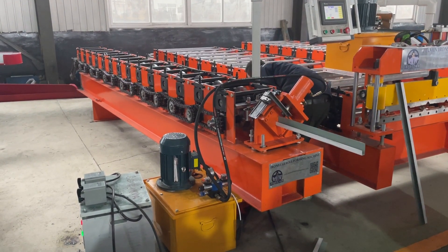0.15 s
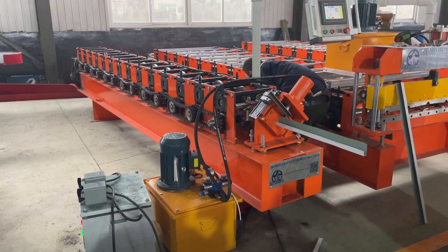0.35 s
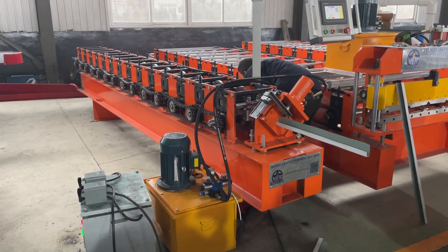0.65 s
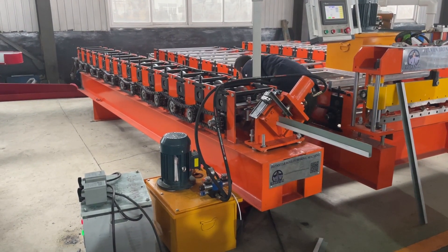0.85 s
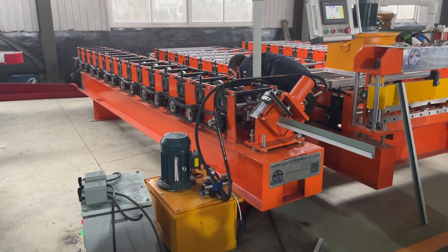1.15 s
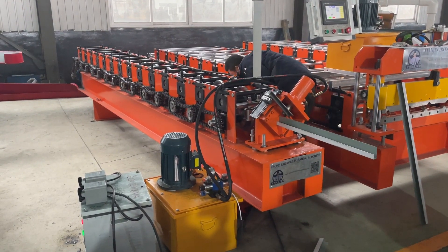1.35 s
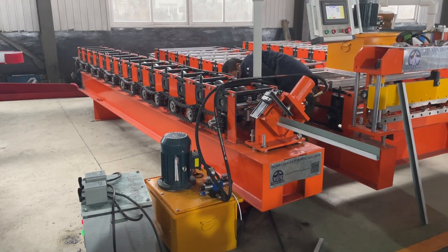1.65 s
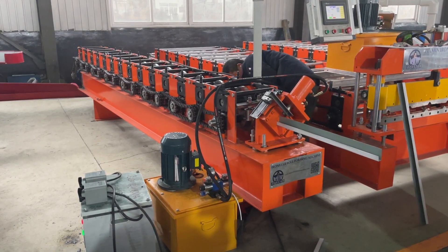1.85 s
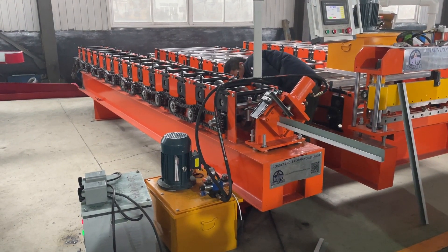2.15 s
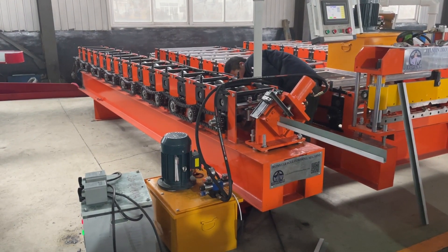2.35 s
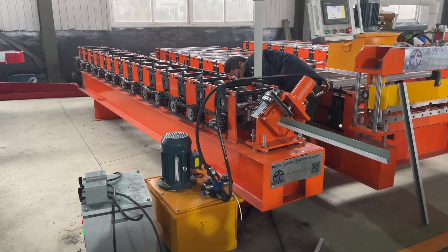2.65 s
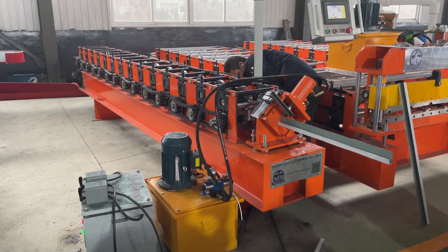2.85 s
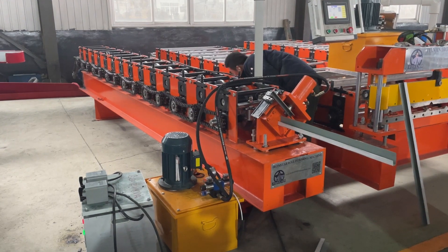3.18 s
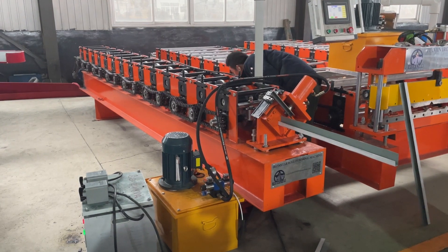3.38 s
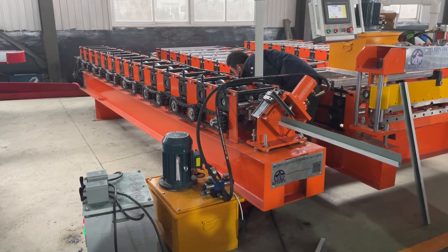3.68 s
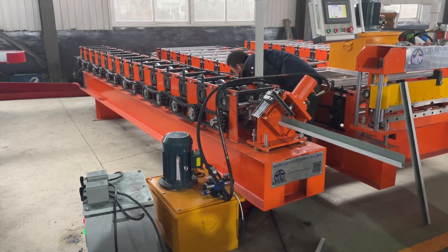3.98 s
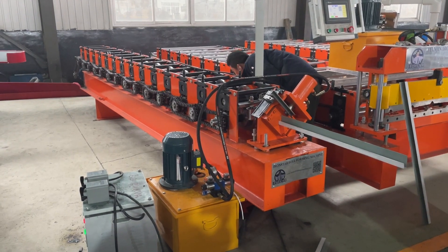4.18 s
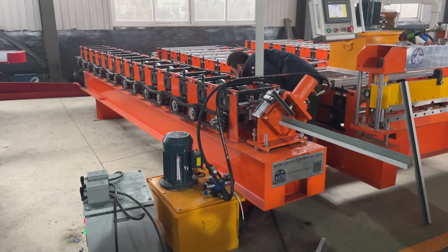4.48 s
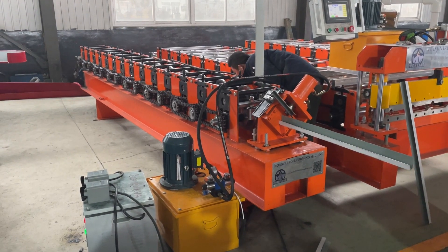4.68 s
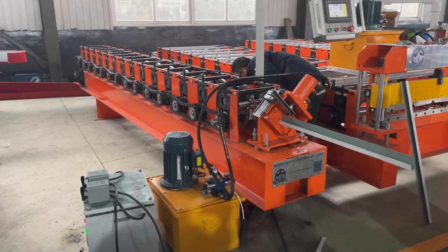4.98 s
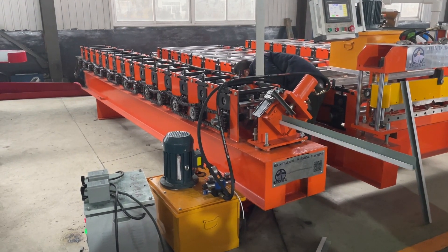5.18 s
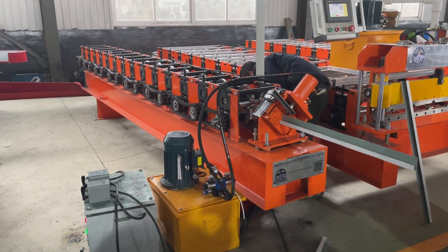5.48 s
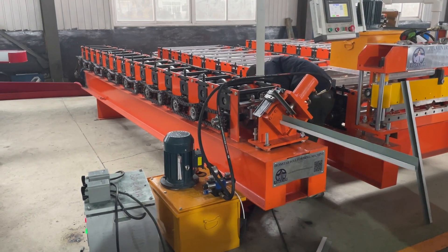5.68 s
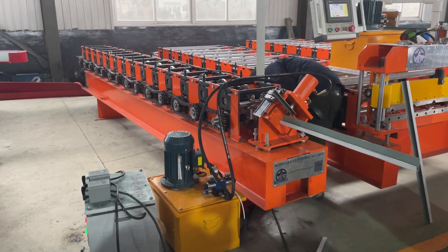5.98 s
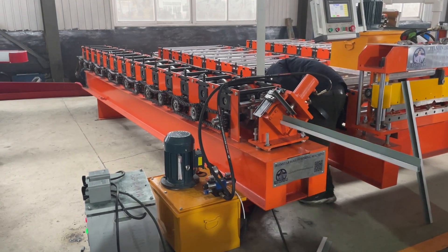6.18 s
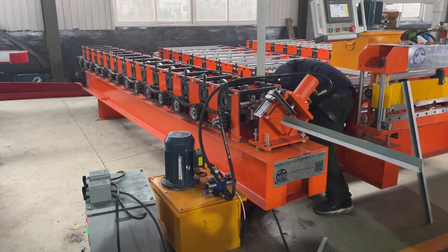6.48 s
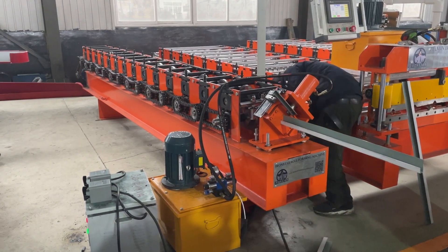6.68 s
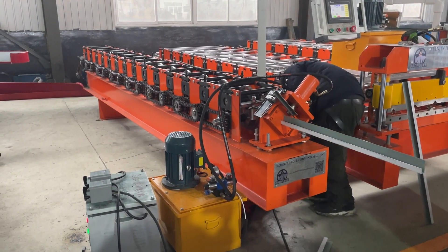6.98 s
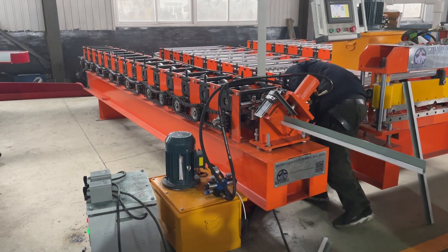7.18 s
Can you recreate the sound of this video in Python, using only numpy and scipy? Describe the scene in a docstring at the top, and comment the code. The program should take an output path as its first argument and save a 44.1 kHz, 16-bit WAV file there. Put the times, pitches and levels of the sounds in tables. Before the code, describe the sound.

A hydraulic pump whines over a rumbling roll forming machine; steel clacks and squealing metal lead to a sharp crack, then a rough grinding hum settles into a drone.

```python
"""A hydraulic pump whines steadily over the rumble of a roll forming machine that feeds out a steel channel.
Steel parts clack and frame modes thud; each blow decays exponentially in the factory hall.
The strip slips and squeals by stick-slip: wavering lines and noise-driven resonances, with scuffs and rasps.
The drive then takes up a heavy load: gear contacts grind as shaped noise, the gear mesh hums in harmonics,
and the sound settles into a drone."""
import sys
import numpy as np
from scipy import signal
from scipy.fft import rfft, irfft, next_fast_len
from scipy.io import wavfile

SR = 44100
rng = np.random.default_rng(int(sys.argv[2]) if len(sys.argv) > 2 else 0)


def bounce(signal):
    """Save signal as a 16-bit WAV file at the path given by the first command-line argument."""
    frames = np.transpose(np.atleast_2d(signal))
    limited = np.clip(frames, -1, 1)
    pcm = np.round(limited * 32767).astype(np.int16)
    wavfile.write(sys.argv[1], SR, pcm)


N = 323694
SIZE = next_fast_len(N + 4096)
TIME = np.arange(N) / SR  # s
FREQ = np.maximum(np.arange(SIZE // 2 + 1) * SR / SIZE, 1)  # Hz

# the drive takes up its load, carries it in full for a while, and the grinding bites at once
LOAD_S, LOAD_HOLD_S, GRIND_ATTACK_S = 3.2, 0.43, 0.032
# dull thuds of the frame, which also shake the roll stands:
# (time [s], level [dB], pitch [Hz], 60 dB decay [s], shake [dB])
THUD_BLOWS = [(.56, -27, 244.7, 0.45, 0.5), (1.512, -29, 290.5, 0.084, -15), (1.658, -38, 233, 0.54, -7.5),
              (3.212, -27, 300, .2, -8), (3.245, -20.5, 272.2, 0.3, -6), (3.335, -21.5, 272, .25, -15),
              (4.285, -27.5, 225, .3, -25), (5.18, -28, 185, .25, -20), (5.213, -19.5, 180, 0.3, -15),
              (5.272, -27, 172, .3, -20)]
# slips of the strip in the rolls; each scuffs, then rasps:
# (time [s], scuff level [dB], scuff rise [s], rasp level [dB])
STRIP_SLIPS = [(.55, 2, 0.037, -9.5), (1.647, 4, 0.042, -15), (1.93, 5.5, 0.012, -9),
               (2.27, 0.5, 0.024, -9), (2.58, 4, .011, -9), (2.91, 2.5, 0.0086, -4), (3.11, 1, 0.027, -15),
               (3.25, 5.5, 0.054, -22), (3.44, -2, 0.017, -11), (3.61, 0, .02, -6)]


def from_db(db):
    """Logarithmic level: decibels to an amplitude gain."""
    return 10 ** (np.asarray(db) / 20)


def rms_one(x):
    """Power normalisation: scale to unit rms."""
    return x / np.sqrt(np.mean(x ** 2) + 1e-20)


def over_hz(points):
    """Spectral interpolation: straight lines on a log-frequency axis."""
    hz, value = np.transpose(points)
    return np.interp(np.log(FREQ), np.log(hz), value)


def filtered(x, response):
    """Linear filtering: multiply the spectrum by a frequency response."""
    return irfft(rfft(x, SIZE) * response, SIZE)[..., :N]


def drift(rate):
    """Low-pass random process: two equal poles at rate [Hz] smooth white noise to unit rms."""
    step = 40  # samples between the slow values
    pole = np.exp(-2 * np.pi * step * rate / SR)
    noise = rng.standard_normal(N // step + 2002)
    slow = signal.lfilter([1], [1, -2 * pole, pole * pole], noise)[2000:]
    return np.interp(np.arange(N) / step, np.arange(len(slow)), rms_one(slow))


def diffuse(response, grain_db=0, grain_rate=100):
    """Partial coherence: clumped, coloured noise that is partly alike at the two microphones."""
    # likeness of the two microphones: (frequency [Hz], correlation [-1 to 1])
    likeness = [(60, .98), (130, .95), (260, .82), (500, .7), (1000, .45), (2000, .5), (4000, .55),
                (8000, .85), (14000, .8)]
    grains = rms_one(from_db(grain_db * drift(grain_rate)))
    force = rng.standard_normal((2, N)) * grains
    mid, side = rfft(force, SIZE) * response * np.sqrt(SR / 2)
    alike = np.clip(over_hz(likeness), 0, 1)
    mid = mid * np.sqrt((1 + alike) / 2)
    side = side * np.sqrt((1 - alike) / 2)
    return irfft(np.array([mid + side, mid - side]), SIZE)[:, :N]


def colour(spectrum=None, modes=()):
    """Power addition: resonances stand on a broad spectrum, as amplitude per root Hz."""
    power = from_db(over_hz(spectrum)) ** 2 if spectrum else 0
    for hz, width, level_db in modes:
        peak = 1 / (1 + ((FREQ - hz) / width) ** 2) ** 2
        area = np.pi / 2 * width
        power = power + peak * from_db(level_db) ** 2 / area
    return np.sqrt(power)


def burst(s, rise, t60):
    """Reverberant decay: a Gaussian swell up to time s, then an exponential fall of 60 dB in t60."""
    age = TIME - s
    swell = (np.minimum(age, 0) / rise) ** 2
    decay = np.log(1000) * np.maximum(age, 0) / t60
    return np.exp(-np.minimum(swell + decay, 60))


def held(start, attack, hold, fade_db_per_s):
    """Exponential build-up with time constant attack; a steady dB fade begins hold seconds after the start."""
    age = np.maximum(TIME - start, 0)
    return (1 - np.exp(-age / attack)) * from_db(-fade_db_per_s * np.maximum(age - hold, 0))


def tone(turns, flutter_db, rate, spread):
    """Interference of hall reflections: a line's level wavers, and its phase wavers at each microphone."""
    level = np.sqrt(2) * from_db(flutter_db * drift(rate))
    ports = [np.sin(2 * np.pi * turns + spread * drift(rate)) for port in range(2)]
    return level * np.array(ports)


def pump():
    """Periodic pressure ripple: harmonics of the vane rate, with the thin electrical whine of the drive."""
    # harmonics of the vanes: (multiple of the vane rate, level [dB])
    vane_orders = [(1, -40.5), (2, -30), (3, -47), (6, -55)]
    # whine of the drive: (frequency [Hz], level [dB])
    whine_lines = [(5168, -68), (6114, -61), (6137.5, -59), (6188, -60), (6262, -63), (6288, -62)]
    vane_hz = 323.1
    turns = np.cumsum(vane_hz * (1 + 0.0002 * drift(1.5))) / SR
    out = 0
    for k, db in vane_orders:
        out = out + from_db(db) * tone(round(k) * turns + rng.random(), flutter_db=.5, rate=8, spread=.1)
    for hz, db in whine_lines:
        out = out + from_db(db) * tone(hz * TIME, flutter_db=3.0, rate=3.6, spread=0.87)
    return out


def hall_air():
    """Stationary noise: motors and fans fill the hall, and resonances of the machine bed boom in it."""
    # motors and fans: (frequency [Hz], spectral level [dB per Hz])
    air_spectrum = [(20, -81), (45, -82), (80, -58), (120, -66.5), (300, -58.5), (650, -65.5), (1100, -67),
                    (2300, -72.5), (3200, -74.5), (4300, -82.5), (6300, -83), (8200, -93.5), (10000, -99),
                    (12500, -103), (15500, -116)]
    # machine bed: (frequency [Hz], width [Hz], level [dB])
    bed_modes = [(80.2, 6, -43), (237, 3.1, -45)]
    return diffuse(colour(air_spectrum, bed_modes), grain_db=1.0, grain_rate=7.2)


def roll_stands():
    """Random excitation: chains and rolls rumble, lighter before the load and harder around each thud."""
    # rumble before its level curve: (frequency [Hz], relative spectral level [dB per Hz])
    rumble_spectrum = [(25, -75), (60, -64), (82, -57), (108, -57.5), (220, -51.5), (340, -53.5),
                       (480, -57), (680, -58), (1000, -65), (1800, -79.5), (4000, -103)]
    rolling_db, ease_db = -1.5, -7.5
    ease_s, ease_time_s = 2.14, 0.45
    eased = np.clip((TIME - ease_s) / ease_time_s, 0, 1)
    eased = eased * (1 - held(LOAD_S, GRIND_ATTACK_S, 0, 0))  # the load ends the lighter running
    shaken = sum(from_db(db) * burst(s, rise=0.02, t60=1.28) for s, *_, db in THUD_BLOWS)
    rolling = from_db(rolling_db + ease_db * eased) + shaken
    return rolling * diffuse(colour(rumble_spectrum), grain_db=2.0, grain_rate=39.0)


def swishes():
    """Amplitude-modulated noise: a tick and soft swishes rise and fall in Gaussian swells."""
    # swells: (time of the top [s], level [dB], standard deviation [s])
    swish_swells = [(.213, -3, 0.0011), (.25, -7, 0.043), (5.46, -9.5, 0.055), (5.83, -4, 0.055),
                    (6.4, -21.5, 0.99), (6.875, -3.5, 0.042)]
    # colour before the swells: (frequency [Hz], relative spectral level [dB per Hz])
    swish_spectrum = [(2000, -81), (4200, -72.5), (6200, -75.5), (8000, -82.5), (10000, -80.5),
                      (13000, -86), (15500, -83)]
    level = sum(from_db(db) * np.exp(-((TIME - s) / width) ** 2 / 2) for s, db, width in swish_swells)
    return level * diffuse(colour(swish_spectrum), grain_db=2.0)


def steel_ring(s, modes, split_hz, length_s, count):
    """Beating of close partials: one blow rings clusters, each partial with its own phase at each microphone."""
    out = np.zeros((2, N))
    span = (TIME >= s) & (TIME < s + length_s)
    age = TIME[span] - s
    spread_db = 1.5  # a blow stirs each mode with a strength of its own
    for hz, db in modes:
        gain = from_db(db + spread_db * rng.standard_normal()) * np.sqrt(2 / count)
        for partial_hz in hz + split_hz * rng.standard_normal(count):
            port_phase = rng.normal(0, 0.49, (2, 1))
            out[:, span] += gain * np.sin(2 * np.pi * (partial_hz * age + rng.random()) + port_phase)
    return out


def clacks(crack_db=-9, crack_t60=0.023):
    """Impact excitation: a short crack, a rattling steel ring and the struck part's own note decay."""
    # blows: (time [s], level [dB], low edge [Hz], top edge [Hz], 60 dB decay [s],
    #         the part's own note [Hz], relative note level [dB])
    blows = [(0.53, -3, 150, 10000, 0.4, 5330, -42), (0.572, -3.5, 300, 9000, 0.49, 1950, -37),
             (.586, -9, 1200, 8000, 0.13, 3900, -44), (.829, -5.5, 1000, 3780, 0.71, 3200, -46),
             (1.386, -2.5, 1780, 8000, 0.34, 2130, -43), (1.399, -13, 3000, 5300, .28, 4040, -39),
             (1.601, -12, 1800, 5000, .35, 3070, -40), (1.926, -12, 1800, 7000, 0.97, 3650, -44),
             (3.2, 11, 6800, 10300, 0.17, 3240, -27), (4.598, 4, 1900, 12500, 0.37, 3600, -39),
             (4.607, -4, 2300, 9000, 0.28, 2480, -36), (4.664, -11, 1800, 9000, 1, 2880, -45),
             (5.179, -0.5, 1220, 15000, 0.43, 4730, -41), (5.197, -5, 2500, 7000, 0.16, 3470, -41)]
    # dense ring before the blow's level: (frequency [Hz], relative spectral level [dB per Hz])
    ring_spectrum = [(100, -73), (400, -84), (1000, -49.5), (1600, -61.5), (2300, -65), (4200, -71),
                     (6200, -73), (8000, -81.5), (10000, -82), (15500, -93)]
    # modes of the struck steel: (frequency [Hz], relative level [dB])
    steel_modes = [(2400, -45), (2510, -45), (2770, -46), (2960, -43), (3430, -45), (3680, -44),
                   (3960, -47), (4140, -48), (4624, -47), (4885, -47), (5300, -49), (5720, -50),
                   (6185, -50), (7950, -51)]
    pair_split_hz, note_split_hz = 22, 55  # a close pair for each mode, a wider cluster for the note
    dense, out = diffuse(colour(ring_spectrum)), 0
    rattle = rms_one(from_db(2 * drift(220)))  # loose parts rattle on after a blow
    for s, db, low_hz, top_hz, t60, note_hz, note_db in blows:
        crack = from_db(crack_db) * burst(s, 0.00036, crack_t60)
        shape = burst(s, .0007, t60) * rattle + crack
        top_hz = np.clip(top_hz, low_hz + 100, SR * .45)
        band = signal.butter(2, [low_hz, top_hz], "band", fs=SR, output="sos")
        ring = dense + steel_ring(s, steel_modes, pair_split_hz, t60, count=2)
        note = steel_ring(s, [(note_hz, note_db)], note_split_hz, t60, count=6)
        out = out + from_db(db) * signal.sosfilt(band, ring * shape) + note * shape
    return out


def scuffs():
    """Sliding friction: each slip of the strip is a gritty swell of clumped noise."""
    # colour before the swells: (frequency [Hz], relative spectral level [dB per Hz])
    scuff_spectrum = [(1000, -71.5), (2000, -74), (3500, -77.5), (4800, -80.5), (6200, -81), (8200, -84),
                      (10500, -90.5), (13000, -109.5), (15500, -102)]
    level = sum(from_db(db) * burst(s, rise, t60=0.75) for s, db, rise, _ in STRIP_SLIPS)
    return level * diffuse(colour(scuff_spectrum), grain_db=1.0, grain_rate=36)


def thuds(width_hz=48, ring_db=-4.0, blur_db=-4.0):
    """Modal decay: a low mode of the frame booms as a line, blurred by the hall into a noise band."""
    out = 0
    for s, db, hz, t60, _ in THUD_BLOWS:
        ring = from_db(ring_db) * tone(hz * (TIME - s), flutter_db=1.5, rate=20, spread=0.25)
        blur = diffuse(colour(modes=[(hz, width_hz, blur_db)]))
        out = out + from_db(db) * burst(s, 0.0029, t60) * (ring + blur)
    return out


def squeal():
    """Stick-slip: one fluttering mode of the strip stirs its neighbours; hard grips squeak, and slips rasp."""
    # squeaks where the strip grips hardest: (start [s], hold [s], level [dB])
    hard_grips = [(1.681, .065, -28.5), (1.975, 0.0081, -20), (2.262, 0.037, -23), (2.315, 0.021, -25),
                  (2.354, 0.062, -29), (2.427, 0.024, -24.5), (2.49, 0.016, -29), (2.526, 0.015, -25.5),
                  (2.578, .018, -25.5), (2.617, .055, -25), (3.102, 0.015, -26), (3.155, 0.0099, -36),
                  (3.236, 0.022, -27), (3.323, 0.027, -32), (3.43, 0.063, -32.5), (3.657, .05, -24),
                  (3.738, .03, -33), (3.955, .03, -32.5), (4.037, 0.04, -33)]
    # modes stirred by the squeal: (frequency [Hz], width [Hz], relative level [dB])
    stirred_modes = [(1900, 32, -29), (1810, 36, -11), (3850, 300, -22), (6170, 64, -25.5)]
    # ragged ring in the hall, which outlasts the squeal: (frequency [Hz], width [Hz], relative level [dB])
    tail_modes = [(1787, 22, -34)]
    # upper modes of the rasps: (frequency [Hz], width [Hz], relative level [dB])
    rasp_modes = [(1937, 70, -28.5), (2240, 30, -42), (5960, 100, -45)]
    # course of a rasp: (delay after the slip [s], rise [s], 60 dB decay [s])
    delay, rise, t60 = (0.058, 0.052, 0.9)
    squeal_hz, wander_hz = 1787, 11
    sing_s, sing_attack_s, sing_hold_s = 1.41, 0.51, 2.2
    sing_db, pan_db = -35.5, -2  # pan: left minus right, ahead of the microphone ports

    flutter = rms_one(from_db(3 * drift(60)))
    singing = from_db(sing_db) * held(sing_s, sing_attack_s, sing_hold_s, fade_db_per_s=26)
    grips = sum(from_db(db) * held(s, .005, hold, fade_db_per_s=700) for s, hold, db in hard_grips)
    turns = np.cumsum(squeal_hz + wander_hz * drift(45)) / SR
    main = np.hypot(singing * flutter, grips) * tone(turns, flutter_db=1.2, rate=60, spread=.3)
    stirred = np.hypot(singing, grips) * diffuse(colour(modes=stirred_modes))
    tail_level = held(sing_s, sing_attack_s, sing_hold_s, fade_db_per_s=14.5)
    tail = tail_level * diffuse(colour(modes=tail_modes))
    rasp_level = sum(from_db(db) * burst(s + delay, rise, t60) for s, *_, db in STRIP_SLIPS)
    rasps = rasp_level * diffuse(colour(modes=rasp_modes))
    return (main + stirred + tail + rasps) * from_db(np.array([[1], [-1]]) * pan_db / 2)


def whistles():
    """Modal self-excitation: higher modes of the strip catch and sing on as thin lines."""
    # lines: (start [s], hold [s], frequency [Hz], level [dB])
    whistle_lines = [(1.94, .36, 3570, -53), (1.95, .23, 4580, -52), (2.27, .09, 6010, -48),
                     (2.295, .07, 4565, -43), (2.41, .06, 3565, -48), (2.6, .35, 3590, -55),
                     (2.9, .1, 5990, -48), (2.92, .1, 2230, -42.5), (2.945, .09, 4565, -46),
                     (3.12, .33, 4565, -55), (3.45, .33, 3575, -51), (3.475, .25, 4565, -48),
                     (3.82, .07, 4565, -51)]
    out = 0
    for s, hold, hz, db in whistle_lines:
        line = tone(hz * TIME, flutter_db=2.2, rate=45, spread=.8)
        out = out + from_db(db) * held(s, .015, hold, fade_db_per_s=130) * line
    return out


def loaded_drive():
    """Resonant filtering of contact noise: throbbing gear contacts give way to a steadier drone in the frame."""
    # colours before the level curves: (frequency [Hz], relative spectral level [dB per Hz])
    grind_spectrum = [(22, -90), (50, -54), (85, -53), (130, -62), (290, -48), (520, -54), (900, -55.5),
                      (1400, -58.5), (2300, -67), (3300, -72.5), (4500, -80), (7500, -90.5), (10000, -92),
                      (15500, -113)]
    drone_spectrum = [(25, -97.5), (55, -54.5), (110, -77), (200, -50.5), (320, -89), (490, -65),
                      (630, -47.5), (740, -66), (1050, -63.5), (1600, -72.5), (2600, -73.5), (4300, -102.5),
                      (15500, -115)]
    # resonances of housing, housing around the mesh pitch, frame:
    # (frequency [Hz], width [Hz], relative level [dB])
    housing_modes = [(266, 7, -39.5), (797, 17, -33.5), (1140, 52, -50), (3250, 130, -46.5)]
    mesh_body = [(405, 55, -31.5)]
    frame_modes = [(233, 9.8, -36), (660, 120, -33), (850, 26, -33.5), (1268, 32, -42), (1770, 2.8, -45.5),
                   (3230, 67, -48)]
    grind_db, drone_db = 1, 3
    grinding = from_db(grind_db) * held(LOAD_S, GRIND_ATTACK_S, LOAD_HOLD_S, fade_db_per_s=10.5)
    droning = from_db(drone_db) * held(LOAD_S, 0.81, LOAD_HOLD_S, fade_db_per_s=2)
    throb_hz = 14 + 2.98 * drift(1.9)
    throb = from_db(1.2 * np.sin(2 * np.pi * np.cumsum(throb_hz) / SR))
    grind = diffuse(colour(grind_spectrum, housing_modes + mesh_body), grain_db=0.0, grain_rate=220)
    drone = diffuse(colour(drone_spectrum, frame_modes), grain_db=2.0, grain_rate=160)
    return throb * grinding * grind + droning * drone


def gear_mesh(wander_hz=6.08):
    """Tooth-meshing harmonics: a rough hum rises a little in pitch as the load eases; a faint hum stays."""
    # harmonics of the mesh: (multiple of the mesh rate, relative level [dB])
    mesh_orders = [(1, -3), (2, -14), (3, -18)]
    loaded_hz, free_hz, settle_s = 391, 413, 0.55
    loaded_db, free_db = -21, -45
    strain = np.exp(-np.maximum(TIME - LOAD_S, 0) / settle_s)
    hz = free_hz + (loaded_hz - free_hz) * strain
    turns = np.cumsum(hz + wander_hz * drift(21.5)) / SR
    hum = 0
    for k, db in mesh_orders:
        hum = hum + from_db(db) * tone(round(k) * turns, flutter_db=3, rate=22.0, spread=0.5)
    loaded = from_db(loaded_db) * held(LOAD_S, 0.04, LOAD_HOLD_S, fade_db_per_s=9)
    free = from_db(free_db) * (1 - strain)
    return np.maximum(loaded, free) * hum


def scene():
    """Superposition: the pressures of all the sources add."""
    machine = pump() + hall_air() + roll_stands()
    blows = clacks() + thuds()
    strip = swishes() + scuffs() + squeal() + whistles()
    load = loaded_drive() + gear_mesh()
    return machine + blows + strip + load


def record(dry):
    """Interaural-type differences: two microphone ports differ in level and phase; a low-pass cuts the top."""
    # (frequency [Hz], left minus right [dB])
    balance = [(40, 0), (130, -1.4), (260, -2), (500, -0.9), (1000, 1.5), (2000, 0.24), (4000, 2),
               (8000, 0.36)]
    # (frequency [Hz], phase by which left leads [rad])
    lead = [(20, 0), (500, 0), (650, .35), (1030, .4), (1810, -.6), (2840, .5), (4130, 0), (5170, .5),
            (6200, -.4), (8400, -3.14), (11300, -6.28), (14900, -9.4)]
    sides = np.array([[1], [-1]]) / 2
    ports = from_db(sides * over_hz(balance)) * np.exp(1j * sides * over_hz(lead))
    low_pass = signal.ellip(10, .1, 80, 15800, fs=SR, output="sos")  # cutoff in Hz
    return signal.sosfilt(low_pass, filtered(dry, ports))


dry = scene()
out = record(dry)
bounce(out)
```